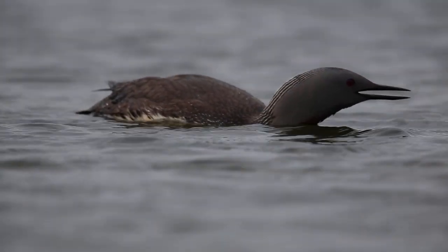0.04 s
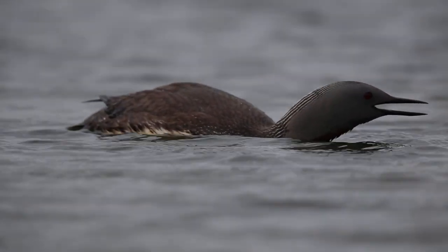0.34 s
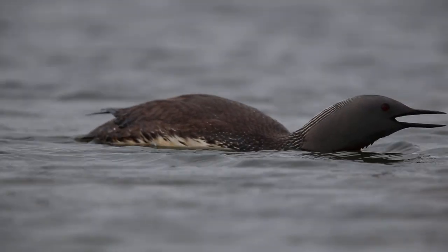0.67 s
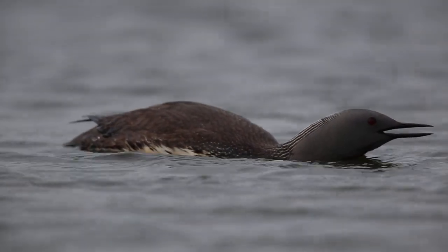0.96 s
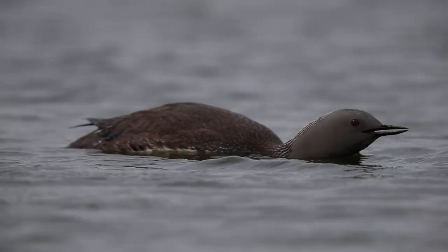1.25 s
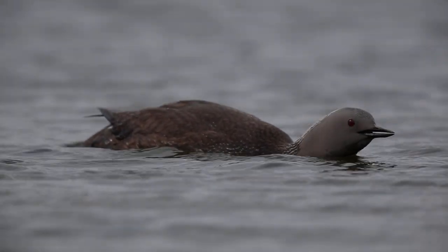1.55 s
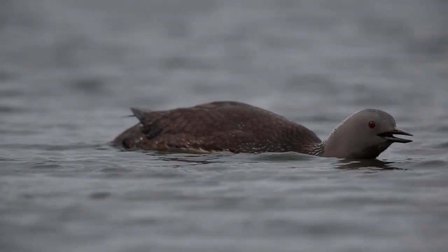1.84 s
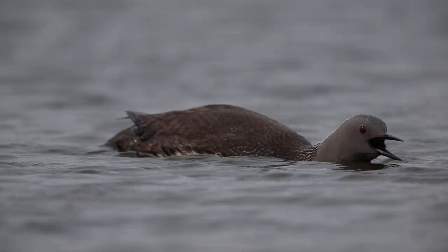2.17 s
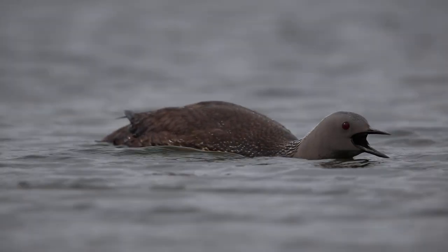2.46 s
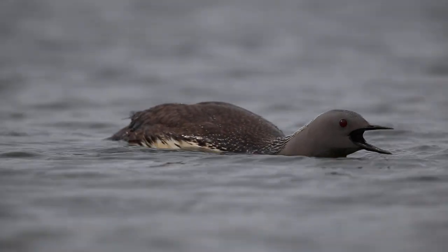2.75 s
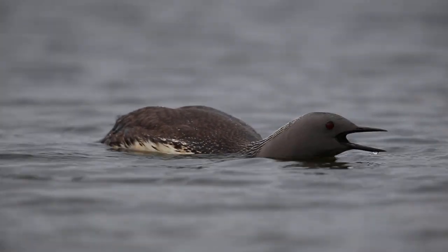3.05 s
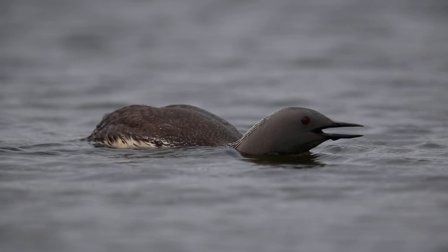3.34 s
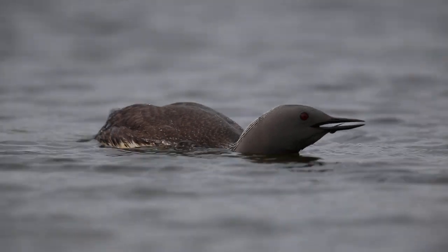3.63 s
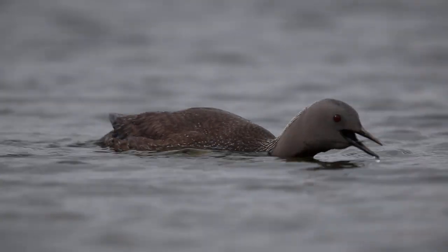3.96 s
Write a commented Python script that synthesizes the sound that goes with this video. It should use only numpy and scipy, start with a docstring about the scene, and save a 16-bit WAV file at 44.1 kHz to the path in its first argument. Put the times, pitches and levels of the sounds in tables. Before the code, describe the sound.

A loon's long hoarse wail ends in a harsh stuttering rattle, over wind and faint water.

```python
"""A loon on a lake. Wind buffets the microphone throughout, over a faint hiss of water.
0 s: one long wail rises, cracks upward, then slowly sinks, turning hoarse and swelling.
From 0.36 s: a second voice slides in four times and beats against it.
3.41 s: a harsh rattle, breaking at 3.64 s into quick stutters with soft moans between them.
3.94 s: a clear last note. The whole call echoes faintly across the water."""
import sys
import numpy as np
from scipy import signal
from scipy.fft import rfft, irfft
from scipy.io import wavfile
from scipy.ndimage import uniform_filter1d

SR = 44100
rng = np.random.default_rng(int(sys.argv[2]) if len(sys.argv) > 2 else 0)


def put_to_file(sound):
    """Save the sound as 16-bit audio at rate SR, in the file named by the first command-line argument."""
    columns = np.atleast_2d(sound).T  # one column per channel
    safe = np.clip(columns, -1, 1)
    whole_steps = np.round(safe * 32767)
    wavfile.write(sys.argv[1], SR, whole_steps.astype(np.int16))


N = 176400
TIME_S = np.arange(N) / SR

# wind envelope: time_s, level_db
GUSTS = [(0.0, -62), (0.12, -33.5), (0.15, -46), (0.34, -50), (0.5, -44), (0.56, -35.5), (0.86, -49.5),
         (0.99, -23), (1.05, -44), (1.08, -31), (1.15, -42.5), (1.39, -47), (1.45, -32.5), (1.58, -45.5),
         (1.6, -35), (1.66, -34.5), (1.68, -56), (1.98, -54.5), (2.02, -40), (2.16, -57.5), (2.32, -45),
         (2.41, -58.5), (2.86, -55), (2.88, -39), (2.95, -56.5), (3.01, -32.5), (3.13, -48.5),
         (3.17, -32.5), (3.21, -44), (3.34, -56.5), (3.39, -20), (3.46, -30), (3.56, -28.5), (3.68, -33.5),
         (3.98, -26.5), (4.0, -62)]
# wind and water spectra: freq_hz, gain_db
WIND_SPECTRUM = [(12,-33.5),(28,-6.5),(50,0.5),(85,5),(130,-1),(200,-8.5),(300,-16.5),(450,-30),(800,-39),(2000,-79)]
WATER_SPECTRUM = [(30,-6.5),(150,11.5),(400,1),(800,-2),(2000,2),(4000,-10),(8000,-12.5),(12000,-16.5),(16000,-20.5)]

# wail pitch, three consecutive stretches: time_s, pitch_hz
WAIL_OPENING = [(0,1051),(.07,1100),(.16,1127),(.277,1185),(.284,1267),(.38,1326),(.425,1297),(.452,1245),(.462,1148)]
WAIL_SINKING = [(.55,1106),(.73,1075),(.77,1053),(.87,1043),(.93,1021),(1,1017),(1.09,984),(1.14,1014),(1.25,980.7),(1.498,919),(1.588,932.3),(1.664,917.6),(2,890.3),(2.246,874),(2.33,894.6),(2.385,861)]
WAIL_CLIMAX = [(2.415,1002),(2.49,1020),(2.55,996.4),(2.7,1003),(2.8,995.3),(2.898,959.5),(3.022,958.3),(3.15,897.5),(3.314,881.5),(3.45,842)]
# wail envelopes before spectral shaping: time_s, fundamental_db, low_overtones_db, treble_db
WAIL_LEVELS = [(0,-46.5,-50,-60),(.08,-41,-40.5,-59),(.27,-36.5,-37,-56),(.34,-38,-37,-59),(.42,-37.5,-42,-59),(.48,-32,-32,-59),(.75,-34,-27.5,-38),(1.1,-35.5,-33,-50),(1.3,-37.5,-33,-38),(1.64,-39.5,-33.5,-36),(1.68,-40,-34,-44),(2.1,-39.5,-29.5,-32),(2.33,-39.5,-35,-31),(2.4,-42,-26,-27),(2.47,-33,-23,-24.5),(2.78,-30.5,-18,-18.5),(2.92,-33,-19.5,-27),(3.05,-34.5,-18,-23.5),(3.15,-39,-24.5,-37),(3.28,-41.5,-27,-34.5),(3.4,-43,-30.5,-42),(3.55,-47.5,-37,-51),(3.65,-86,-87,-84)]
# alternating strong and weak cycles, giving lines halfway between harmonics: time_s, gain_db
PERIOD_DOUBLING = [(0,-30),(.33,-19),(.5,-13.5),(.8,-10.5),(1.05,-11),(1.3,-4.5),(1.45,-5.5),(1.6,2),(1.75,-5.5),(1.95,-4),(2.05,-12),(2.35,-19),(2.5,-6.5),(2.72,-12.5),(2.76,-31.5),(2.87,-36.5),(2.92,-9),(3.02,-14.5),(3.15,-13),(3.4,-12.5)]
# hoarseness: time_s, roughness_0_to_1
ROUGHNESS = [(0,0),(.11,0.11),(.17,0.42),(.275,0.46),(.29,0),(.45,0.04),(.55,0.12),(.78,0.06),(.9,.27),(.97,0.23),(1.02,0.05),(1.1,.05),(1.16,0.3),(1.24,.35),(1.27,0),(1.9,0.08),(2.33,0.15),(2.4,0.96),(2.45,0.38),(2.53,0.01),(3.12,0),(3.2,0.08),(3.29,0.3),(3.33,0.07)]
# spectra of throat with open bill, half lines, hoarse noise: freq_hz, gain_db
THROAT_SPECTRUM = [(400,-36),(600,-29),(850,-10),(1300,-11),(1750,-2.5),(2000,-2.5),(2280,-8.5),(2650,-14.5),(3000,-17.5),(3350,-27.5),(4000,-39),(4650,-22.5),(5000,-23.5),(6000,-37.5),(7000,-52),(9000,-49.5),(13000,-62.5)]
HALF_LINE_SPECTRUM = [(500,4),(1370,0.5),(1500,-6),(2400,-3),(3500,6.5),(4500,0.5),(5500,4),(9000,8)]
HOARSE_SPECTRUM = [(400,-35),(700,-27.5),(1000,-4.5),(1750,1),(2300,-3.5),(3000,-13.5),(3800,-23.5),(5000,-30),(6500,-44),(12000,-48.5)]
# thin whistle on the wail's eighth harmonic: time_s, level_db
WHISTLE_LEVELS = [(1.9,-72),(2,-63),(2.1,-57),(2.33,-64),(2.38,-78)]

# second voice, one list per entry: time_s, pitch_hz, level_db, overtone_gain_db
SECOND_VOICE_NOTES = [
    [(.36,1716,-51,-20),(.4,1713,-38,-23),(.46,1730,-43,-20)],
    [(.66,867,-52,-5),(.7,892,-52,-2),(.76,972,-45,-7),(.81,966,-43,5),(.89,1023,-39.5,11),(.95,1063,-41,10),(1.08,1035,-36,3.5),(1.14,959,-46,-10),(1.21,942,-46,-9),(1.25,913,-60,-5)],
    [(2.01,960,-45,2),(2.06,1033,-43,0),(2.12,1057,-38,-3),(2.2,1078,-37,3),(2.26,1084,-33,-6),(2.35,1092,-29,4.5),(2.385,1091,-31.5,6),(2.41,1000,-57,2)],
    [(3.29,820,-37.5,-3),(3.315,878,-36,-11),(3.34,949,-29.5,3),(3.365,930,-31.5,-3),(3.39,882,-36,-6),(3.41,854,-31.5,-2.5)],
]
# its throat: freq_hz, gain_db
SECOND_THROAT_SPECTRUM = [(800,3.5),(1100,-1.5),(1700,-7),(2080,-3),(2170,2),(2700,-33),(3150,-35.5),(3260,-22.5),(3700,-38),(4250,-30),(5200,-29),(6300,-49),(9000,-59)]

# even pulse train: time_s, pulses_per_s, level_db
RATTLE_TRAIN = [(3.412,190,-21.5),(3.435,200,-19),(3.455,210,-16),(3.5,214,-16),(3.55,215,-16),(3.59,214,-17),(3.632,212,-18.5)]
# pulse harmonics 2 and 3: gain_db
PULSE_OVERTONES_DB = [-24,-49]
# their fade as the bill closes: time_s, gain_db
OVERTONE_FADE = [(3.41,1),(3.5,3.5),(3.6,3.5),(3.7,-6.5),(3.9,-23)]
# noise in each pulse: freq_hz, gain_db
SPIT_SPECTRUM = [(900,-8.5),(1900,13.5),(2400,-9),(3200,-6.5),(3800,-11),(5000,-19.5),(7000,-17),(9000,-20),(13000,-39)]
# resonance of the closing bill: time_s, centre_hz, gain_db
BILL_RESONANCE = [(3.43,6700,-21),(3.55,6300,-12),(3.65,6150,4.5),(3.8,5480,0),(3.92,4940,-2.5)]
# stutters: start_s, level_db, ring_level_db
STUTTERS = [(3.6429,-15.5,-18.5),(3.673,-14.5,-28),(3.7039,-14,-24),(3.7327,-15.5,-28),(3.7623,-13,-40),(3.7924,-14.5,-34),(3.8226,-14,-31),(3.8524,-14,-26),(3.8821,-15,-13.5),(3.9134,-16,-25)]
# three pulses of a stutter: delay_s, gain_db
STUTTER_PULSES = [(0,0),(.0058,-1),(0.0105,-2.5)]

# clear last note: time_s, pitch_hz, level_db, overtone_gain_db
LAST_NOTE = [(3.941,1200,-29,-4),(3.952,1235,-25.5,-3),(3.975,1252,-25.5,0),(4.01,1300,-25.5,2)]
# closed bill: freq_hz, gain_db
CLOSED_BILL_SPECTRUM = [(1300,8),(2500,-26.5),(3800,-32),(6300,-34.5),(7600,-48),(9000,-34),(12000,-53)]


def amp(db):
    """Decibels to gain."""
    return 10 ** (np.asarray(db) / 20)


def unit_rms(x):
    """Scale to rms 1."""
    return x / np.sqrt(np.mean(x ** 2) + 1e-20)


def curve(rows, column=1):
    """One column of a time table at every sample."""
    rows = np.array(rows)
    return np.interp(TIME_S, rows[:, 0], rows[:, column])


def gain_at(spectrum, hz):
    """Gain of a spectrum, interpolated over log frequency."""
    freq_hz, gain_db = np.transpose(spectrum)
    return amp(np.interp(np.log(hz + 1), np.log(freq_hz), gain_db))


def noise(spectrum):
    """Shaped noise, rms 1."""
    gain = gain_at(spectrum, np.fft.rfftfreq(N, 1 / SR))
    return unit_rms(irfft(rfft(rng.standard_normal(N)) * gain, N))


def wander(rate_hz):
    """Low-passed random motion, rms 1."""
    rolloff = 1 + (np.fft.rfftfreq(N, 1 / SR) / rate_hz) ** 2
    return unit_rms(irfft(rfft(rng.standard_normal(N)) / rolloff, N))


def phase_of(hz):
    """Running phase in radians."""
    return 2 * np.pi * np.cumsum(hz) / SR


def add(mix, start_s, sound):
    """Mix a sound in, in place."""
    part = mix[max(round(start_s * SR), 0):][:len(sound)]
    part += sound[:len(part)]


def wind(buffet_db=5):
    """Wind on the microphone: lumpy low rumble following the gusts."""
    rumble = noise(WIND_SPECTRUM) * amp(buffet_db * wander(17))
    return amp(curve(GUSTS)) * unit_rms(rumble)


def water(level_db=-51.5):
    """Faint steady hiss of the lake."""
    return amp(level_db) * noise(WATER_SPECTRUM)


def wail(harmonics=12, flutter_hz=100, shake_rad=0.77, treble_from_hz=1830, treble_blend_hz=1870):
    """Harmonics and half lines through the throat; hoarseness shakes them and adds noise."""
    rough = curve(ROUGHNESS)
    pitch_hz = curve(WAIL_OPENING + WAIL_SINKING + WAIL_CLIMAX) * (1 + 0.001 * wander(35))
    phase = phase_of(pitch_hz) + shake_rad * rough * wander(flutter_hz)
    fundamental, low, treble = (amp(curve(WAIL_LEVELS, column=c)) for c in (1, 2, 3))
    doubling = amp(curve(PERIOD_DOUBLING) + 3 * wander(42))
    tone = fundamental * np.sin(phase) * (1 + 0.5 * rough * wander(flutter_hz))
    for k in np.arange(1, 2 * harmonics + 1) / 2:
        if k == 1:
            continue
        treble_share = np.clip((k * np.median(pitch_hz) - treble_from_hz) / treble_blend_hz, 0, 1)
        gain = low ** (1 - treble_share) * treble ** treble_share
        gain *= gain_at(THROAT_SPECTRUM, k * pitch_hz)
        if k % 1:  # half line
            gain *= doubling * gain_at(HALF_LINE_SPECTRUM, k * pitch_hz)
        if k > 2:  # upper lines drift in level
            gain *= amp(3 * wander(6.3))
        partial = np.sin(k * phase + 2 * np.pi * rng.random())
        shimmer = 1 + 0.68 * rough * wander(flutter_hz)
        tone += gain * partial * shimmer
    hoarse = amp(-4.5) * rough * np.hypot(fundamental, low) * noise(HOARSE_SPECTRUM)
    whistle = amp(curve(WHISTLE_LEVELS)) * np.sin(8 * phase)
    return np.sqrt(2) * (tone / np.hypot(1, rough) + whistle) + hoarse


def lake_echo(call, gain_db=-19, t60_s=0.28, rise_s=0.06):
    """Faint diffuse echo across the water."""
    t = TIME_S[:SR]
    tail = rng.standard_normal(SR) * amp(-60 * t / t60_s) * np.minimum(t / rise_s, 1)
    return amp(gain_db) * signal.fftconvolve(call, tail / np.linalg.norm(tail))[:N]


def clear_note(rows, spectrum, waver, harmonics=8, fade_s=0.0017):
    """Slightly wavering harmonic tone, shaped by throat or bill."""
    pitch_hz = curve(rows) * (1 + waver * wander(54))
    gate = np.clip(np.minimum(TIME_S - rows[0][0], rows[-1][0] - TIME_S) / fade_s, 0, 1)
    on = gate > 0
    phase = phase_of(pitch_hz[on])
    brightness = amp(curve(rows, column=3)[on])
    tone = np.zeros(N)
    for k in range(1, harmonics + 1):
        tone[on] += gain_at(spectrum, k * pitch_hz[on]) * (brightness if k > 2 else 1) * np.sin(k * phase)
    return np.sqrt(2) * tone * gate * amp(curve(rows, column=2))


def second_voice():
    """Sliding notes that beat against the wail when close in pitch."""
    return sum(clear_note(rows, SECOND_THROAT_SPECTRUM, waver=0.0087) for rows in SECOND_VOICE_NOTES)


def rattle_pulses():
    """Pulses of the stutters and the even train: start_s, level_db."""
    running = (TIME_S >= RATTLE_TRAIN[0][0]) & (TIME_S < RATTLE_TRAIN[-1][0])
    cycles = np.cumsum(curve(RATTLE_TRAIN) * running) / SR
    level_db = curve(RATTLE_TRAIN, column=2)
    train = [(TIME_S[i], level_db[i]) for i in np.flatnonzero(np.diff(np.ceil(cycles)))]
    triplets = [(start_s + delay_s, db + gain_db)
                for start_s, db, _ in STUTTERS for delay_s, gain_db in STUTTER_PULSES]
    return triplets + train


def bill_hiss(puffs, width_hz=350, hold_s=0.034):
    """Noise band at the closing bill's resonance; some carries on between pulses."""
    band = wander(width_hz) * np.sin(phase_of(curve(BILL_RESONANCE)))
    envelope = 0.5 * puffs + 0.87 * uniform_filter1d(puffs, round(hold_s * SR))
    return amp(curve(BILL_RESONANCE, column=2) - 21.5) * envelope * band


def rattle(pulse_s=0.00513, from_hz=1536, to_hz=1100, jitter_s=0.00007, spit_db=-13):
    """Short falling chirps, in an even train and then in threes, each with a spit of noise."""
    tone, puffs = np.zeros(N), np.zeros(N)
    progress = np.arange(0, pulse_s, 1 / SR) / pulse_s
    envelope = np.sin(np.pi * progress ** 0.86) ** 0.89
    sweep_hz = from_hz + (to_hz - from_hz) * progress
    for start_s, level_db in rattle_pulses():
        late, loud, sharp = rng.standard_normal(3)
        phase = phase_of(sweep_hz * (1 + 0.017 * sharp))
        fade_db = np.interp(start_s, *np.transpose(OVERTONE_FADE))
        chirp = np.sin(phase)
        for k, gain_db in enumerate(PULSE_OVERTONES_DB, 2):
            chirp += amp(gain_db + fade_db) * np.sin(k * phase)
        add(tone, start_s + jitter_s * late, amp(level_db + 0.5 * loud) * envelope * chirp)
        add(puffs, start_s, amp(level_db + 1.55 * sharp) * envelope * np.exp(-1.5 * progress))
    spit = amp(spit_db) * puffs * noise(SPIT_SPECTRUM)
    return tone + spit + bill_hiss(puffs)


def moans(length_s=0.021, delay_s=0.0085, from_hz=990, to_hz=869, level_db=-26, octave_db=-12.5):
    """After the train and each stutter, the voice drops to a soft falling tone."""
    out = np.zeros(N)
    progress = np.arange(0, length_s, 1 / SR) / length_s
    envelope = np.sqrt(np.sin(np.pi * progress))
    sweep_hz = from_hz + (to_hz - from_hz) * progress
    starts_s = [RATTLE_TRAIN[-1][0] - length_s / 2] + [row[0] + delay_s for row in STUTTERS]
    for start_s in starts_s:
        phase = phase_of(sweep_hz * (1 + 0.024 * rng.standard_normal()))
        add(out, start_s, envelope * (np.sin(phase) + amp(octave_db) * np.sin(2 * phase)))
    return amp(level_db) * out


def stutter_rings(pitch_hz=1226, length_s=0.013, delay_s=0.0135):
    """Brief ring trailing each stutter."""
    out = np.zeros(N)
    t = np.arange(0, length_s, 1 / SR)
    ring = np.sin(np.pi * (t / length_s) ** 0.39) * np.sin(2 * np.pi * pitch_hz * t)
    for start_s, _, ring_db in STUTTERS:
        add(out, start_s + delay_s, amp(ring_db) * ring)
    return out


def last_note():
    """Rising, nearly pure tone through the closed bill."""
    return clear_note(LAST_NOTE, CLOSED_BILL_SPECTRUM, waver=0.0023)


def scene():
    """Voices and their echo over wind and water, mono."""
    background = wind() + water()
    call = wail() + second_voice() + rattle() + moans() + stutter_rings() + last_note()
    return (background + call + lake_echo(call))[None]


def record(dry, cutoff_hz=15850):
    """Low-pass band limit."""
    lowpass = signal.firwin(511, cutoff_hz, window=("kaiser", 9), fs=SR)
    return signal.oaconvolve(dry, lowpass[None], "same")


dry = scene()
out = record(dry)
put_to_file(out)
```